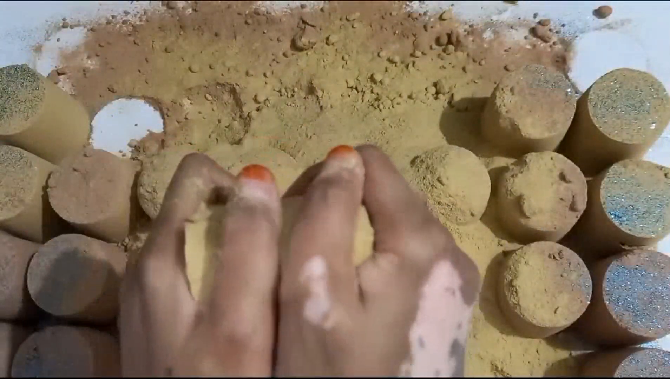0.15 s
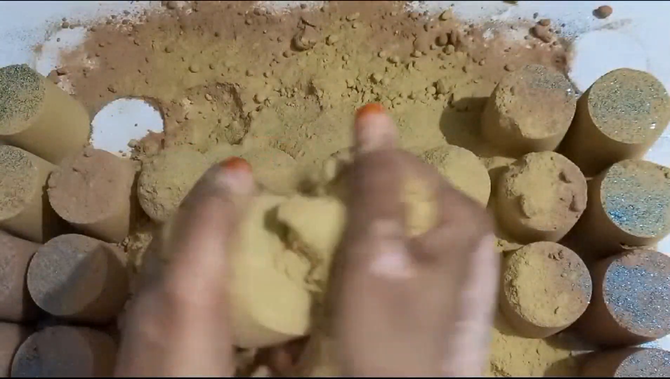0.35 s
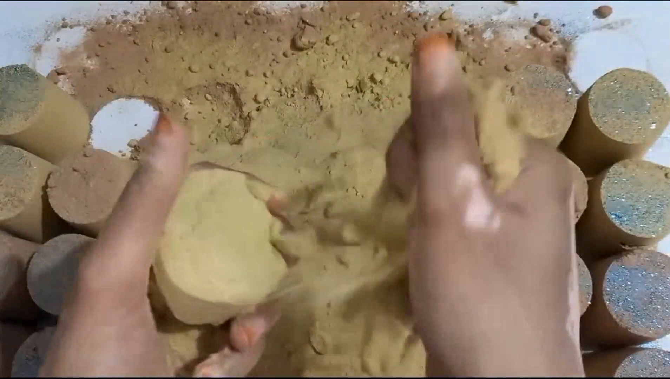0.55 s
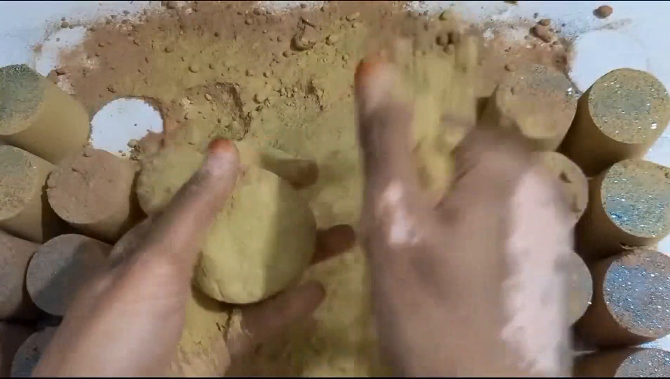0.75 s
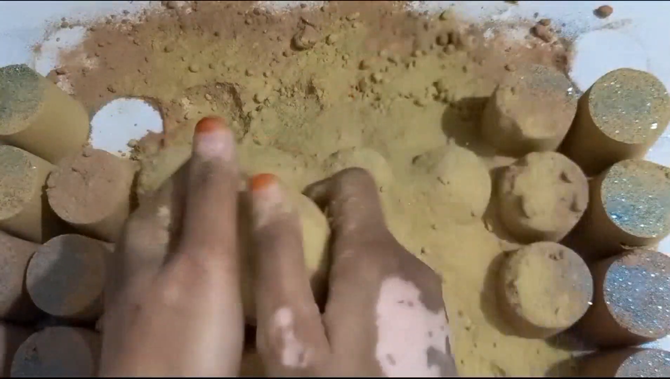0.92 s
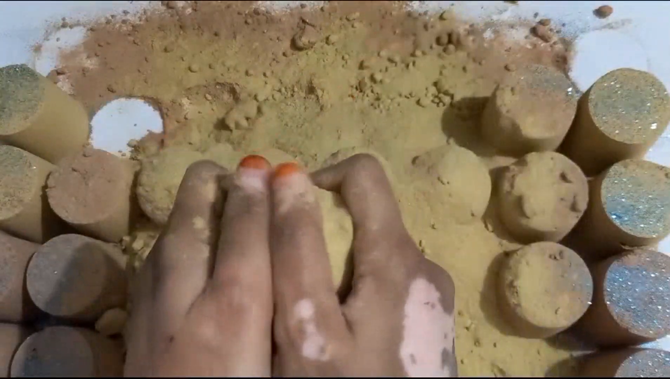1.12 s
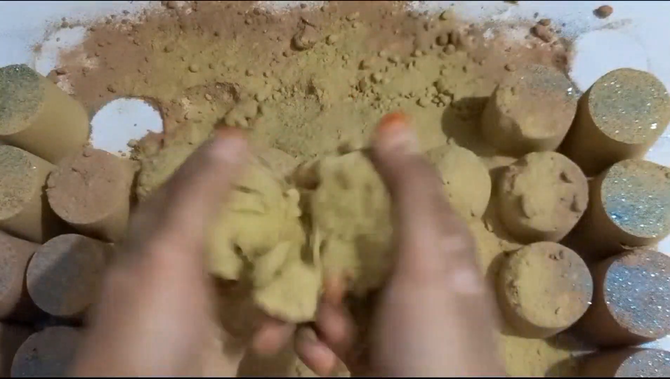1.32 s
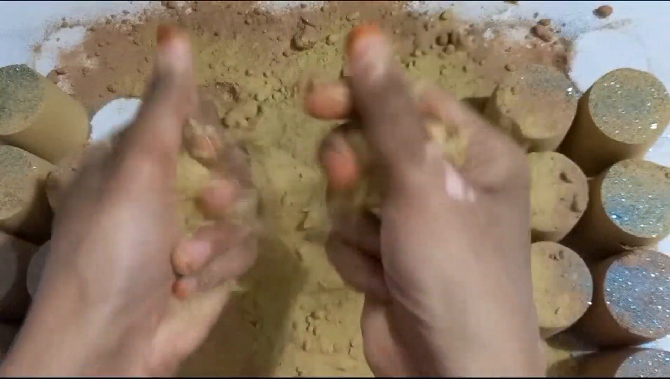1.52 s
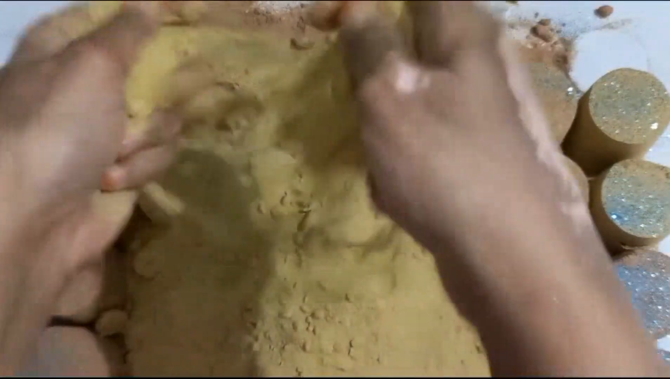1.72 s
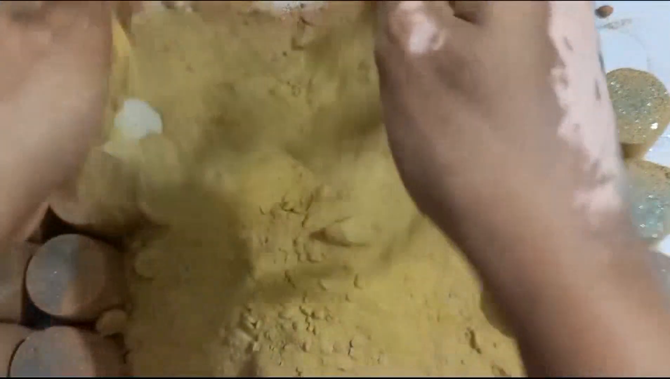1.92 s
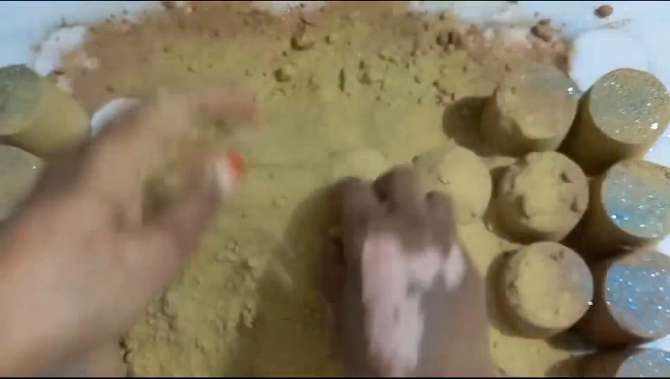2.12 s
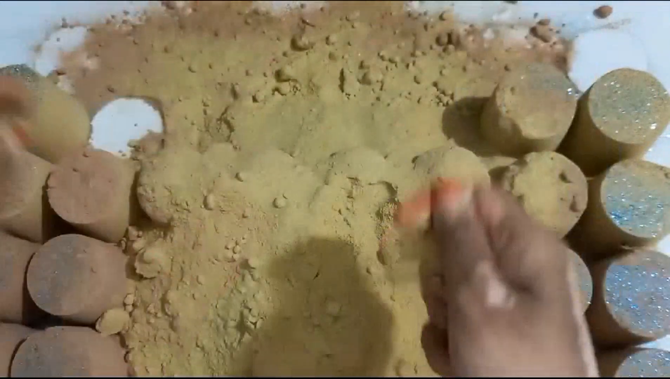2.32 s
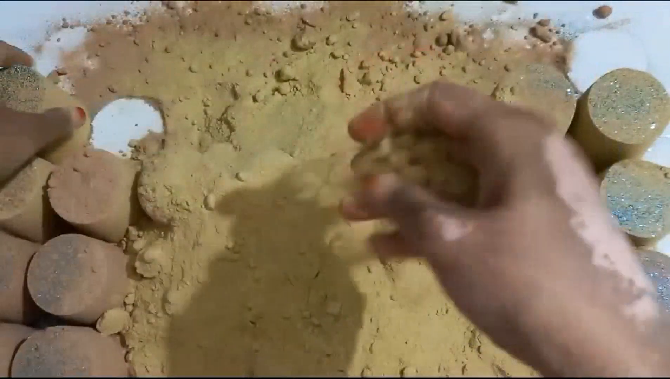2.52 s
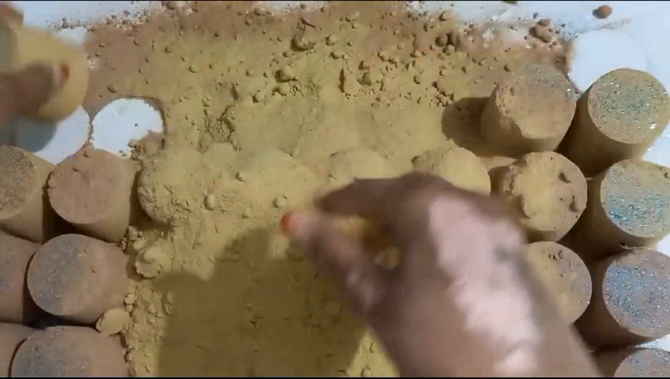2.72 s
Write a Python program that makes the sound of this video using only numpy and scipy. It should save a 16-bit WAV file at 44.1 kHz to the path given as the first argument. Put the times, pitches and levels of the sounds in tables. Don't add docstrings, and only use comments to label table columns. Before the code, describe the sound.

Hands crush dry powder blocks close to a stereo phone in a small quiet room. Soft gritty rubbing leads to a strong dull thud and snap at 0.25 s, then crumbling with small snaps around 0.5 and 0.7. A second block thuds at 1.2, cracks sharply at 1.45-1.6, and crumbles until 2.05. Brief crunches follow near 2.3, airy palm brushing at 2.6, and a light tick at 2.9.

```python
import sys
import numpy as np
from scipy import signal
from scipy.fft import rfft, irfft, next_fast_len
from scipy.io import wavfile
from scipy.ndimage import uniform_filter1d, map_coordinates

SR = 44100
rng = np.random.default_rng(int(sys.argv[2]) if len(sys.argv) > 2 else 0)


def convert_level_to_amplitude(level_db):
    exponent = np.asarray(level_db, float) / 20
    return 10 ** exponent


def put_to_file(sound):
    columns = np.atleast_2d(sound).T
    safe = np.clip(columns, -1, 1)
    whole_steps = np.round(safe * 32767)
    wavfile.write(sys.argv[1], SR, whole_steps.astype(np.int16))


N = 127890

# (frequency [Hz], level [dB])
GRIT_SPECTRUM = [(900, -35), (2500, -17.5), (4500, -3), (6500, 1), (7100, -8), (7900, -28.5), (14300, -39),
                 (14900, -9.5)]
# (frequency [Hz], level [dB])
LUMP_SPECTRUM = [(300, -12), (700, -10.5), (950, -7), (1300, -1), (1700, -5), (2200, 0), (4000, -4),
                 (7000, -35.5)]


def unit(x):
    return x / np.sqrt(np.mean(x ** 2) + 1e-20)


def wobble(rate):
    knots = rng.standard_normal(int(N * rate / SR) + 4)
    return map_coordinates(knots, [np.arange(N) * rate / SR])


def band_noise(hz, width, shape):
    band = signal.butter(2, [hz / width, hz * width], "band", fs=SR, output="sos")
    return signal.sosfilt(band, rng.standard_normal(shape))


def coloured(pair, spectrum, patchy_db, size=7):
    # (frequency [Hz], likeness [0-1])
    coherence = [(60, 0.45), (200, 0.25), (600, 0.33), (2500, 0.1), (6000, 0.71), (10000, 0.78),
                 (15000, 0.63)]
    z = signal.stft(pair, nperseg=512)[2]
    field = uniform_filter1d(rng.standard_normal(z.shape[1:]), size=size, axis=0)
    field = uniform_filter1d(field, size=6, axis=1)
    pair = signal.istft(z * convert_level_to_amplitude(patchy_db * unit(field)), nperseg=512)[1][:, :N]
    m = next_fast_len(N + 8192)
    log_hz = np.log(np.fft.rfftfreq(m, 1 / SR) + 1)

    def along(points):
        hz, value = np.transpose(points)
        return np.interp(log_hz, np.log(hz), value)

    turn = np.arccos(np.clip(along(coherence), -1, 1)) / 2
    shaped = rfft(pair, m) * convert_level_to_amplitude(along(spectrum))
    mid, side = irfft(shaped * [np.cos(turn), np.sin(turn)], m)[:, :N]
    return unit(np.array([mid + side, mid - side]))


def grains(share, spread_db):
    size = np.minimum(rng.exponential(size=N), 3)
    struck = (rng.random(N) < share) * convert_level_to_amplitude(spread_db * size)
    return rng.standard_normal((2, N)) * (1 + struck)


def swells(s, rise, fall, db):
    t = np.arange(N) / SR
    distance = np.abs(np.where(t < s, (s - t) / rise, (t - s) / fall))
    edge_db, roundness = 23, 1.71
    return np.sqrt(convert_level_to_amplitude(2 * (db - edge_db * distance ** roundness)).sum(0))


def placed(x, lead=6):
    # (time [s], left over right [dB])
    balance = [(0, 5.5), (.25, 1.5), (1, 4.5), (1.2, 2), (1.5, 2.5), (2.04, 0.5), (2.3, 2.5), (2.55, 2.5),
               (2.9, 2)]
    pan = np.interp(np.arange(N) / SR, *np.transpose(balance)) / 2
    left, right = x * convert_level_to_amplitude([pan, -pan])
    return np.array([left, np.pad(right, (lead, 0))[:N]])


def rubbing():
    # (peak time [s], rise [s], fall [s], grit level [dB], lumps over the grit [dB])
    first_block = [(0.117, 0.014, 0.099, -44.5, -1), (0.142, 0.0096, 0.051, -44.5, -9.5),
                   (0.248, 0.022, 0.03, -31.5, 1.5), (0.329, 0.24, 0.07, -48.5, 0),
                   (0.19, 0.081, 0.06, -55.5, -29), (0.486, 0.056, 0.18, -41.5, -1),
                   (0.525, 0.054, 0.097, -37, -5.5), (0.627, 0.063, 0.039, -45.5, -5.5),
                   (0.697, 0.054, 0.079, -35, -7), (0.798, 0.055, 0.083, -45.5, -6.5),
                   (0.828, 0.041, 0.015, -49, 6), (.895, 0.074, 0.11, -46.5, -14),
                   (1.029, 0.18, 0.32, -64, -20)]
    second_block = [(1.188, 0.021, 0.035, -42, -8), (1.221, 0.064, 0.057, -47.5, 2.5),
                    (1.306, 0.083, 0.083, -49, -9.5), (1.408, 0.03, 0.072, -51, -27),
                    (1.456, 0.05, 0.057, -38.5, -6), (1.49, 0.026, 0.013, -35, -1.5),
                    (1.53, 0.064, 0.047, -32, 2), (1.573, 0.038, 0.11, -34.5, -2.5),
                    (1.743, 0.023, 0.098, -38, -12.5), (1.778, 0.069, 0.0493, -34, -4.5),
                    (1.86, 0.39, 0.084, -44.5, -4), (1.914, 0.052, 0.12, -35.5, -7),
                    (1.934, 0.025, 0.11, -38.5, -5), (2.044, 0.045, 0.018, -40.5, -8.5),
                    (2.166, 0.17, 0.12, -69.5, 2.5), (2.25, 0.016, 0.014, -50, -13),
                    (2.304, 0.022, 0.035, -38, -1), (2.343, 0.083, 0.076, -41.5, -3),
                    (2.388, 0.065, 0.075, -40.5, -10), (2.599, 0.093, 0.11, -44, -26),
                    (2.68, 0.1, 0.019, -52.5, -15)]
    # (peak time [s], rise [s], fall [s], level [dB])
    palm_strokes = [
        (0, .03, 0.055, -48),
        (2.538, 0.024, .04, -48),
        (2.59, 0.065, 0.066, -34),
        (2.62, 0.048, .045, -36.5),
        (2.84, 0.065, 0.076, -52),
        (2.897, 0.028, .03, -41.5),
    ]
    # (frequency [Hz], level [dB])
    palm_spectrum = [(1500, -23), (3200, -7.5), (4300, 3.5), (5800, 7.5), (7000, -0.5), (8000, -21.5),
                     (14000, -34), (15200, -8.5)]
    # (frequency [Hz], level [dB])
    dust_spectrum = [(7000, -6.5), (8000, -5), (10500, -3), (14500, -3), (16000, 0.5)]

    s, rise, fall, db, coarse_db = np.transpose(first_block + second_block)[:, :, None]
    fine_swell = swells(s, rise, fall, db)
    coarse_swell = swells(s, rise, fall, db + coarse_db)
    dust_db, growth, pivot_db = -19.5, 2.28, -41.5
    finer_swell = swells(s, rise, fall, db - 0.33 * (coarse_db + 5.0))
    dust_swell = convert_level_to_amplitude(dust_db + pivot_db) * (finer_swell / convert_level_to_amplitude(pivot_db)) ** growth
    palm_swell = swells(*np.transpose(palm_strokes)[:, :, None])

    grit = convert_level_to_amplitude(1.3 * wobble(200)) * coloured(grains(0.034, spread_db=4), GRIT_SPECTRUM, patchy_db=3.1, size=2)
    dust = convert_level_to_amplitude(0.66 * wobble(200)) * coloured(grains(0.05, spread_db=5.5), dust_spectrum, patchy_db=6, size=3)
    lumps = convert_level_to_amplitude(1.2 * wobble(120)) * coloured(grains(0.01, spread_db=4), LUMP_SPECTRUM, patchy_db=3.7, size=2)
    palm = convert_level_to_amplitude(2.0 * wobble(280)) * coloured(grains(0.18, spread_db=0.5), palm_spectrum, patchy_db=4.5, size=3)

    near = fine_swell * unit(grit) + palm_swell * unit(palm)
    rolling = convert_level_to_amplitude(-1.5) * coarse_swell * unit(lumps)
    return placed(dust_swell * unit(dust), lead=0) + placed(near) + placed(rolling, lead=2)


def thuds():
    # (peak time [s], level [dB], pitch [Hz], t60 [s])
    blows = [(0.2468, -14, 229, 0.032), (0.2525, -26.5, 261, 0.074), (0.354, -39, 350, 0.063),
             (0.356, -41.5, 234, 0.081), (0.518, -41, 215, 0.073), (0.607, -49.5, 186, 0.037),
             (0.827, -40, 304, 0.066), (0.769, -54.5, 334, 0.23), (0.979, -62, 246, 0.077),
             (1.1818, -21, 232, 0.026), (1.1875, -28, 242, 0.01), (1.1899, -35, 289, 0.1),
             (1.207, -38.5, 188, 0.079), (1.524, -28, 460, 0.028), (1.526, -35.5, 201, 0.073),
             (2.061, -44.5, 198, 0.09), (2.301, -58.5, 305, 0.19)]
    # (frequency ratio, level [dB])
    block_modes = [(1.033, -2), (1.538, -8), (0.696, -9)]
    out = np.zeros(N + SR)
    before = 441
    u = (np.arange(SR // 4) - before) / SR
    soft = signal.butter(2, [120, 1100], "band", fs=SR, output="sos")
    attack_s, crumble_db = 0.0032, -5
    lean = 0.62
    for s, db, hz, t60 in blows:
        ring = 0
        for ratio, level in block_modes:
            decay = convert_level_to_amplitude(level - 60 * np.abs(u) * (ratio - 1) / t60 / 2)
            ring = ring + decay * np.cos(2 * np.pi * hz * ratio * u + lean)
        noise = unit(signal.sosfilt(soft, rng.standard_normal(len(u))))
        crumble = convert_level_to_amplitude(crumble_db) * noise * np.clip(u / 0.0053, 0, 1)
        shape = np.where(u < 0, np.exp(-(u / attack_s) ** 2), convert_level_to_amplitude(-60 * u / t60))
        out[round(s * SR) - before:][:len(u)] += convert_level_to_amplitude(db) * shape * (ring + crumble)
    return out[:N]


def snaps():
    # (time [s], level [dB], pitch [Hz])
    fractures = [(0.2457, -40, 1110), (0.249, -12, 3000), (0.477, -17.5, 1360), (0.523, -21, 1140),
                 (1.1802, -55, 1010), (1.453, -17, 3000), (1.484, -10, 1950), (1.5231, -13.5, 1090),
                 (1.756, -25, 1380), (1.865, -30, 634), (1.928, -18, 2310), (2.303, -21.5, 1940),
                 (2.385, -23, 1770), (2.892, -28, 4200)]
    out = np.zeros(N + SR)
    t = np.arange(SR // 4) / SR
    t60_s, attack_s = 0.032, 0.00096
    for s, db, hz in fractures:
        burst = unit(band_noise(hz, 1.15, len(t)))
        shape = convert_level_to_amplitude(db - 16 - 60 * t / t60_s) * (1 - np.exp(-t / attack_s))
        out[round(s * SR):][:len(t)] += shape * burst
    return out[:N]


def cracks():
    # (time [s], peak level [dB], lumps over the grit [dB])
    bursts = [(0.114, -25, -9.5), (0.1373, -34.5, -2), (0.4795, -33.5, 1), (0.6778, -32.5, -5),
              (0.7956, -45, 5), (0.8875, -31, -2), (1.1652, -49, -1.5), (1.18, -27, 2.5),
              (1.2022, -34, -2.5), (1.391, -45, -3), (1.4048, -44.5, -6), (1.4356, -32.5, -9),
              (1.449, -27, -3), (1.4818, -14, -0.5), (1.524, -29, -32), (1.5494, -17.5, 0),
              (1.5774, -24, 5.5), (1.734, -38.5, -1), (1.7614, -36, 7.5), (1.9116, -21.5, 6),
              (1.9301, -29.5, -11), (2.038, -30, 3.5), (2.2493, -43, 0), (2.2947, -25, -0.5),
              (2.302, -30, 2), (2.5437, -36.5, -4), (2.5736, -36.5, -10.5), (2.5924, -29, -1.5),
              (2.6149, -30.5, -9), (2.8919, -29.5, -11)]
    s, db, coarse_db = np.transpose(bursts)[:, :, None]
    u = np.clip(np.arange(N) / SR - s, 0, 1)
    level_db, t60_s, attack_s = -11, 0.051, 0.0008
    shape = convert_level_to_amplitude(level_db + db - 60 * u / t60_s) * (1 - np.exp(-u / attack_s))
    grit = coloured(rng.standard_normal((2, N)), GRIT_SPECTRUM, patchy_db=4, size=4)
    lumps = coloured(rng.standard_normal((2, N)), LUMP_SPECTRUM, patchy_db=-3, size=4)
    coarse_shape = (shape * convert_level_to_amplitude(coarse_db - 8.5)).sum(0)
    return placed(shape.sum(0) * grit) + placed(coarse_shape * lumps, lead=2)


def scrapes():
    # (time [s], length [s], frequency [Hz], level [dB])
    drags = [(0.791, 0.029, 2380, -63), (0.876, 0.047, 3150, -54.5), (0.974, 0.032, 886, -66.5),
             (1.031, 0.063, 1330, -78.5), (1.206, 0.03, 2110, -50.5), (1.492, .03, 1125, -42.5),
             (1.535, .025, 2250, -51), (1.599, 0.073, 1090, -60), (1.73, 0.046, 1284, -48),
             (1.79, 0.047, 1120, -52.5), (1.855, 0.036, 616, -53), (1.905, 0.051, 2340, -48.5),
             (1.98, 0.042, 2400, -63), (2.037, 0.017, 3870, -65), (2.149, 0.05, 1255, -58),
             (2.283, 0.022, 2180, -41.5), (2.37, 0.028, 1990, -55), (2.597, 0.037, 2350, -46.5),
             (2.652, 0.044, 2530, -57), (2.657, 0.032, 6040, -65), (2.82, 0.057, 4380, -56.5),
             (2.818, 0.04, 4000, -63.5), (2.882, .03, 4070, -41.5)]
    out = np.zeros((2, N))
    t = np.arange(N) / SR
    for s, length, hz, db in drags:
        a, b = unit(band_noise(hz, 1.065, (2, N)))
        swell = np.sin(np.pi * np.clip((t - s) / length, 0, 1)) ** 0.66
        out += convert_level_to_amplitude(db) * swell * np.array([a + 0.37 * b, a - 0.94 * b])
    return placed(out, lead=2)


def tray():
    # (peak time [s], level [dB], length [s])
    sways = [(0.134, -51, 0.043), (.26, -36, 0.044), (0.418, -53.5, 0.084), (0.608, -54, 0.065),
             (0.652, -56, 0.076), (0.772, -56.5, 0.1), (0.828, -42.5, 0.021), (1.195, -34.5, 0.037),
             (1.535, -47, 0.061), (1.616, -50.5, 0.061), (2.073, -48, 0.044), (2.417, -54.5, 0.026),
             (2.462, -54, 0.037), (2.692, -58, 0.056), (2.757, -52.5, 0.064), (2.805, -57.5, 0.045)]
    # (frequency [Hz], level [dB])
    rumble_spectrum = [(25, -50), (50, -35.5), (90, 1), (130, -1), (250, -50), (400, -61)]
    s, db, length = np.transpose(sways)[:, :, None]
    t = np.arange(N) / SR
    energy = convert_level_to_amplitude(2 * db) * np.exp(-((t - s) / (0.33 * length)) ** 2)
    swell = np.sqrt(energy.sum(0))
    mode_hz, mode_db, rough_db = 86.1, -0.5, -4
    ring = convert_level_to_amplitude(mode_db) * np.sin(2 * np.pi * mode_hz * t + 1.24 * wobble(23))
    rough = convert_level_to_amplitude(rough_db) * coloured(rng.standard_normal((2, N)), rumble_spectrum, patchy_db=1.5)
    return swell * (ring + rough)


def walls(x):
    t = np.arange(SR // 4) / SR
    t60_s = 0.1
    tail = rng.standard_normal((2, len(t))) * convert_level_to_amplitude(-60 * t / t60_s)
    return signal.fftconvolve(x[None], tail / np.linalg.norm(tail[0]), axes=1)[:, :N]


def toots():
    # (time [s], length [s], frequency [Hz], level [dB])
    calls = [
        (.05, .055, 1420, -64),
        (2.06, .1, 1055, -63),
        (0, .05, 510, -64),
    ]
    t = np.arange(N) / SR
    drift = 0.8 * wobble(120)
    out = 0
    for s, length, hz, db in calls:
        swell = np.sin(np.pi * np.clip((t - s) / length, 0, 1)) ** 0.24
        out = out + convert_level_to_amplitude(db) * swell * np.sin(2 * np.pi * hz * t + drift)
    return out


def room_floor():
    # (frequency [Hz], level [dB])
    room_spectrum = [(30, -27), (85, 3.5), (200, -9.5), (700, -19), (4500, -34), (6400, -17.5),
                     (7800, -42.5), (14300, -35.5), (14900, -22)]
    # (time [s], level [dB])
    room_course = [(0, -61.5), (.07, -61.5), (.4, -61), (1.05, -64), (1.38, -62), (2.2, -59.5),
                   (2.48, -62.5), (2.73, -65), (2.9, -62.5)]
    level_db = np.interp(np.arange(N) / SR, *np.transpose(room_course)) + 1.2 * wobble(7.36)
    return convert_level_to_amplitude(level_db) * coloured(rng.standard_normal((2, N)), room_spectrum, patchy_db=2.5)


def scene():
    thud, snap = thuds(), snaps()
    blocks = thud + placed(snap, lead=2)
    echo = convert_level_to_amplitude(-8.5) * walls(thud + 2.15 * snap)
    hands = rubbing() + blocks + cracks() + scrapes()
    return hands + tray() + echo + toots() + room_floor()


def roll_off(x):
    return signal.sosfilt(signal.butter(12, 15900, fs=SR, output="sos"), x)


def record(dry):
    top_hz = 15850
    m = next_fast_len(N + 8192)
    passed = np.fft.rfftfreq(m, 1 / SR) < top_hz
    mix = irfft(rfft(dry, m) * passed, m)[:, :N]
    return roll_off(mix)


dry = scene()
out = record(dry)
put_to_file(out)
```